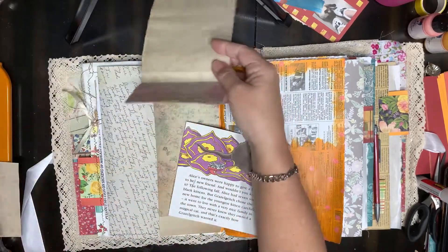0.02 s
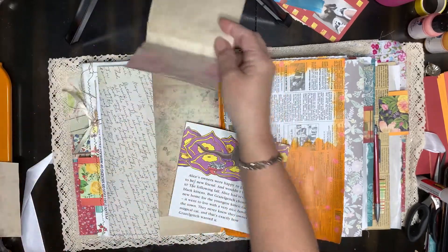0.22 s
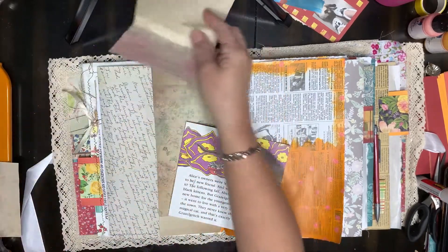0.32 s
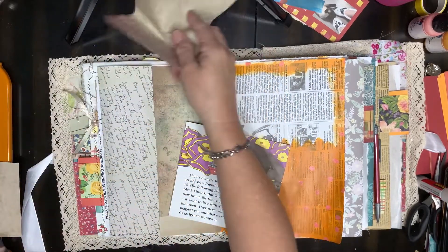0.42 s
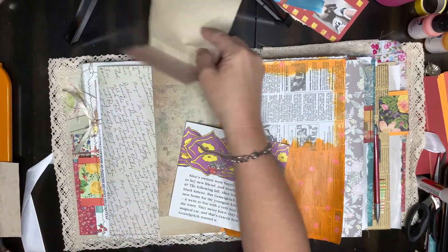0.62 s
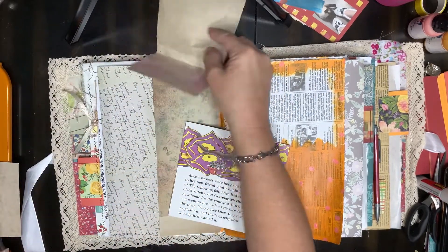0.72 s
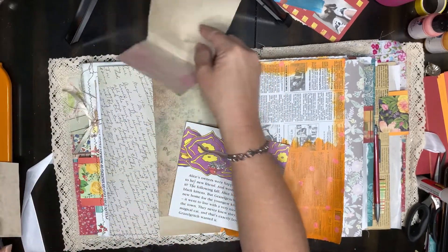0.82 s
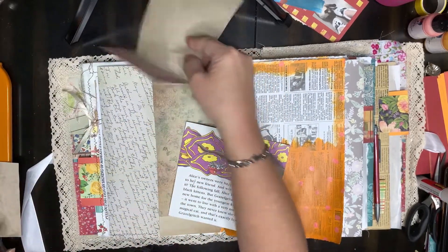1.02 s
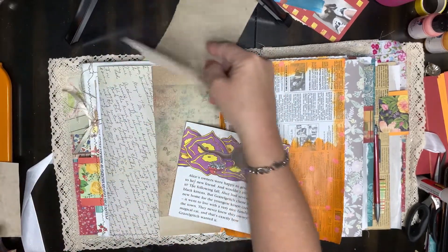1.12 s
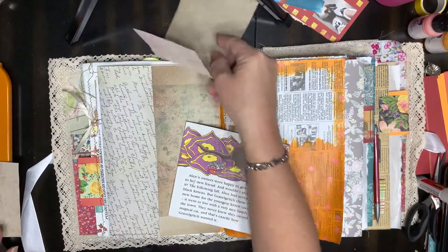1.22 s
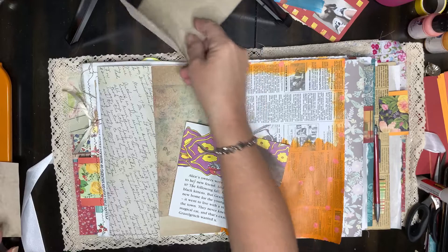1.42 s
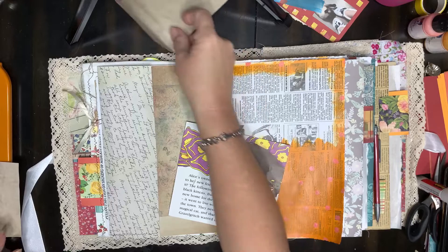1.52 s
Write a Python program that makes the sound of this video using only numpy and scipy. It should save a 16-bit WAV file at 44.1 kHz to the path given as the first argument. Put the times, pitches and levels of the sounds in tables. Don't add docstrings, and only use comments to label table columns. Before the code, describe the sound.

Stiff paper crackles and pops as it is bent above a desk, loudest near the start, with a second cluster around one second, soft hand thuds, then quiet rustle; close, fairly dry indoor sound.

```python
import sys
import numpy as np
from scipy import signal
from scipy.fft import rfft, irfft
from scipy.io import wavfile
from scipy.ndimage import uniform_filter1d, minimum_filter1d

SR = 44100
rng = np.random.default_rng(int(sys.argv[2]) if len(sys.argv) > 2 else 0)


def gain_from_db(level_db):
    decades = np.asarray(level_db, float) / 20
    return 10 ** decades


def int16_out(signal):
    q = np.round(np.clip(np.atleast_2d(signal).T, -1, 1) * 32767)
    wavfile.write(sys.argv[1], SR, q.astype(np.int16))


N = 68355


def evened(x):
    return x / np.sqrt(np.mean(x ** 2) + 1e-20)


def to_db(power):
    return 10 * np.log10(power + 1e-20)


def read(points, hz):
    f, value = np.transpose(points)
    return np.interp(np.log(hz + 1), np.log(f + 1), value)


def add(mix, s, sound):
    part = mix[round(s * SR):][:len(sound)]
    part += sound[:len(part)]


def colour(x, points):
    log_gain = np.log(gain_from_db(read(points, abs(np.fft.fftfreq(4096, 1 / SR)))))
    taps = np.fft.ifft(np.exp(np.conj(signal.hilbert(log_gain)))).real[:2048]
    return signal.oaconvolve(x, taps / np.linalg.norm(taps))[:len(x)]


def resonate(x, hz, width):
    r = np.exp(-np.pi * width / SR)
    ringing = signal.lfilter([1, 0, -1], [1, -2 * r * np.cos(2 * np.pi * hz / SR), r * r], x)
    return np.sqrt(2 * (1 - r * r)) * ringing / 2


def grains(count, per_s, spread_db):
    draw = rng.random((count, 3))
    size_db = spread_db * np.minimum(-np.log(draw[:, 0] + 1e-9), 4)
    size = gain_from_db(size_db) * np.sign(draw[:, 1] - .5)
    return evened(size * (draw[:, 2] < per_s / SR))


# f/Hz, level/dB
BODY = [(150, -2.5), (300, -12), (500, -11), (1200, -9), (2000, -12), (3500, -27), (6000, -26.5)]


def flexed(x, hz):
    return 0.76 * colour(x, BODY) + 0.46 * resonate(x, hz, .45 * hz)


# f/Hz, level/dB
CRACK = [(300, -39.5), (1000, -0.5), (2500, 1), (5000, 5), (8000, -3), (11000, -4), (14000, -18.5),
         (16000, -26)]
# t/s, level/dB, sheet f/Hz, crack over body/dB, crack f/Hz
SNAPS = [(0.0739, -40.5, 950, -0.5, 6800), (0.2472, -39, 1450, 10, 5950), (0.2881, -28, 1530, 5.5, 6000),
         (0.29, -12, 1487, -10.5, 6400), (0.2962, -37, 1700, 1, 7100), (0.3161, -15, 1320, -17, 4900),
         (0.3515, -19, 1170, -0.5, 3870), (0.3538, -21, 1390, 4.5, 3780), (0.3903, -23, 1680, -25, 3000),
         (.463, -22.5, 723, -26, 2960), (0.512, -24, 1470, -17, 2600), (0.541, -24, 910, 1, 5450),
         (0.6433, -19, 1194, 0.5, 2640), (0.674, -15.5, 1165, 3.5, 6370), (0.677, -15.5, 924, 1, 3400),
         (0.8053, -33, 920, 11, 7020), (0.8693, -40, 1120, 10, 7000), (0.886, -34, 1680, 11, 7040),
         (.9405, -29, 840, -12, 2070), (0.9444, -20.5, 497, -16, 3150), (.9475, -25, 780, -11, 3000),
         (0.9572, -29.5, 1820, 9.5, 10200), (0.9626, -16.5, 1365, -11, 2900),
         (0.9758, -38, 1970, 8.5, 3000), (1.0186, -22.5, 1980, -2, 6600)]
CRACK_T60_S, CRACK_RISE_S, CRACK_WIDTH = .009, .0004, 0.23
BODY_T60_S, BODY_RISE_S, BODY_LAG_S = 0.067, 0.000995, 0.00074
KICK_DB, KICK_WIDTH, RATTLE_DB = 6, .14, -4


def snaps():
    out, t = np.zeros(N), np.arange(4000) / SR
    late = np.maximum(t - BODY_LAG_S, 0)
    for s, db, hz, crack_db, crack_hz in SNAPS:
        a, b = rng.standard_normal((len(t), 2)).T
        burst = np.tanh(2 * a) * (1 - np.exp(-t / CRACK_RISE_S)) * gain_from_db(-60 * t / CRACK_T60_S)
        crack = colour(burst, CRACK) + 0.8 * resonate(burst, crack_hz, CRACK_WIDTH * crack_hz)
        crack = crack * gain_from_db(crack_db + 18.5)
        rattle = flexed(b * (1 - np.exp(-late / BODY_RISE_S)) * gain_from_db(-60 * late / BODY_T60_S), hz)
        push = np.exp(-2 * (hz * (late - BODY_RISE_S) * np.pi) ** 2) * hz / 1000
        kick = resonate(push, hz, KICK_WIDTH * hz)
        add(out, s, gain_from_db(db - 17.0) * (crack + gain_from_db(RATTLE_DB) * rattle + gain_from_db(KICK_DB) * kick))
    return out


# t/s, level/dB, sheet f/Hz, length/s, hiss over body/dB
SLIPS = [(.079, -48.5, 1000, 0.0077, 7.5), (0.282, -26, 1430, 0.0081, 2), (0.398, -33, 1290, 0.012, 3),
         (.418, -32.5, 1080, 0.0079, -22), (0.53, -30.5, 1230, 0.013, -2.5), (.582, -41, 1940, 0.0025, 1.5),
         (.935, -32.5, 710, 0.013, -20), (0.954, -27.5, 1720, 0.0045, 1.5), (1.004, -44.5, 2100, 0.0085, 9),
         (.664, -34, 1180, 0.011, -24), (.792, -45.5, 1010, 0.0089, -5), (.845, -50, 547, 0.025, -7),
         (.2445, -35.5, 1240, 0.0083, -1), (.266, -41, 1290, 0.0084, -33), (1.315, -59, 1120, 0.016, 3.5),
         (1.38, -66, 2050, 0.011, 5), (.214, -43, 2100, 0.0028, 5), (1.172, -48, 1700, 0.014, -1),
         (1.232, -51.5, 1360, 0.013, -17)]
# t/s, level/dB, sheet f/Hz, length/s, hiss over body/dB
DRAGS = [(.142, -52, 1700, 0.039, 1.5), (.192, -44.5, 1020, 0.049, 6), (.294, -29, 1190, 0.023, -4.5),
         (.322, -39, 1410, 0.0055, 1), (.428, -41, 1040, 0.0065, -5), (.608, -37.5, 2080, 0.03, -13),
         (.646, -28, 544, 0.00089, -13), (.654, -40.5, 880, 0.0069, 3), (1.0205, -31.5, 1500, 0.0043, -1),
         (.765, -41, 1630, 0.02, -9.5), (.968, -37.5, 1840, 0.01, -10), (.985, -45, 1500, 0.013, -1),
         (.997, -45, 2020, 0.0061, 4.5), (.808, -45, 910, 0.0049, -7), (.829, -54.5, 1202, 0.015, -2),
         (1.035, -54.5, 1380, 0.038, 4.5), (1.065, -54.5, 940, 0.032, -0.5), (1.27, -65, 2620, 0.05, 2.5)]
SWELL_RISE, DRAG_RISE = .8, .08
SLIP_T60_S, SLIP_GRAINS_PER_S = 0.0414, 2500


def slips(rows, rise):
    out, t = np.zeros(N), np.arange(9000) / SR
    for s, db, hz, length, hiss_db in rows:
        drive = 0.59 * grains(len(t), SLIP_GRAINS_PER_S, 2.8) + 0.57 * rng.standard_normal(len(t))
        fade = gain_from_db(-60 * np.maximum(t - length, 0) / SLIP_T60_S)
        rub = drive * np.minimum(t / (rise * length), 1) * fade
        add(out, s, gain_from_db(db) * (flexed(rub, hz) + gain_from_db(hiss_db) * colour(rub, CRACK)))
    return out


# t/s, rustle level/dB
EFFORT = [(0.0, -78), (0.144, -64), (0.262, -55), (0.341, -41), (0.41, -51), (0.69, -57.5), (0.8, -48.5),
          (.852, -59.5), (.9, -53), (1.078, -52), (1.15, -61.5), (1.22, -56), (1.33, -52.5), (1.44, -55),
          (1.55, -61.5)]
# f/Hz, level/dB
FIZZ = [(200, -36), (650, -26), (850, -6.5), (1200, -4), (3000, 1), (6000, -1), (9000, 0), (13000, -5),
        (16000, -14.5)]
GRAINS_PER_S, FLEX_SLOPE, FLEX_DB = 4400, 3.4, -15


def rustle():
    effort_db = np.interp(np.arange(N) / SR, *np.transpose(EFFORT))
    clumps = gain_from_db(2.54 * evened(uniform_filter1d(rng.standard_normal(N), size=500)))
    fizz = colour(grains(N, GRAINS_PER_S, 2.4) + 0.82 * rng.standard_normal(N), FIZZ)
    flex = colour(grains(N, 800, 3.2), BODY) * gain_from_db(FLEX_DB + (FLEX_SLOPE - 2) * (effort_db + 20))
    return gain_from_db(effort_db) * clumps * (fizz + flex)


# f/Hz, width/Hz, level/dB
SHEET = [(478, 260, -2), (905, 80, 3.5), (1176, 15, -7), (1356, 23, -16), (1680, 39, 3), (2080, 66, 4.5),
         (2830, 28, -35), (3130, 44, 0.5), (3410, 37, -4), (3900, 220, -17)]
SHEET_DB = -11.5


def sheet(x):
    tones = sum(gain_from_db(db) * resonate(x, hz, width) * np.sqrt(width / 3000) for hz, width, db in SHEET)
    return x + gain_from_db(SHEET_DB) * tones


# t/s, level/dB, f/Hz, length/s
THUDS = [
    (0.1, -56, 370, 0.014),
    (0.324, -48.5, 99.7, 0.033),
    (0.469, -48.5, 190, 0.021),
    (.56, -69, 160, 0.073),
    (0.797, -51, 208, 0.041),
    (1.08, -67, 184, 0.05),
]


def thuds():
    out = np.zeros(N)
    for s, db, hz, length in THUDS:
        t = np.arange(0, 2 * length, 1 / SR)
        swell = np.sin(np.pi * np.sqrt(t / (2 * length))) ** 2
        add(out, s, gain_from_db(db) * swell * np.sin(2 * np.pi * hz * t))
    return out


# f/Hz, t60/s
ROOM = [(300, 0.17), (1000, 0.12), (4000, 0.16), (12000, 0.029)]


def room(x):
    taps = np.zeros((2, 16000))
    at = np.arange(120, 15960, 20) + rng.integers(0, 20, (2, 792))
    np.put_along_axis(taps, at, rng.choice([-1., 1.], at.shape), 1)
    hz, t, z = signal.stft(taps, SR, nperseg=128)
    tail = signal.istft(z * gain_from_db(-60 * t / read(ROOM, hz)[:, None]), SR, nperseg=128)[1]
    return signal.fftconvolve(x[None], tail / np.linalg.norm(tail[0]), axes=1)[:, :N]


# f/Hz, level/dB
HUM = [(15, -57), (30, -24), (50, -5.5), (91, -5), (150, -3.5), (180, -17), (320, -30), (500, -40)]
# f/Hz, level/dB, t60/s
RING = [
    (296, -62, 1),
    (500, -75, 0.32),
]
# t/s, rumble change/dB, low-mid floor change/dB
STIR = [
    (0, -2, -5.5),
    (.2, -4, 9),
    (0.341, 1.5, 21),
    (.7, 0, 7),
    (.9, 2, 14),
    (1.1, -1.5, 9.5),
    (1.2, 0, 2.5),
    (1.33, -10.5, -3.5),
    (1.55, -5, -7.5),
]
HUM_DB, FLOOR_DB = -61, -74.5


def hum():
    a, b = rng.standard_normal((N, 2)).T
    shape, t = gain_from_db(read(HUM, np.fft.rfftfreq(N, 1 / SR))), np.arange(N) / SR
    at, rumble_db, floor_db = np.transpose(STIR)
    rumble = evened(irfft(rfft(np.array([a + 0.097 * b, a - 0.15 * b])) * shape, N))
    rumble = rumble * gain_from_db(HUM_DB + np.interp(t, at, rumble_db))
    c, d = rng.standard_normal((N, 2)).T
    low_cut = signal.butter(3, 190, "high", fs=SR, output="sos")
    floor = [signal.sosfilt(low_cut, colour(colour(v, BODY), BODY)) for v in (c + .25 * d, c - .25 * d)]
    floor = gain_from_db(FLOOR_DB + np.interp(t, at, floor_db)) * np.array(floor)
    ring = sum(gain_from_db(db - 60 * t / t60) * np.sin(2 * np.pi * hz * t) for hz, db, t60 in RING)
    return rumble + floor + ring


# f/Hz, phase/rad
LEAD = [(0, 0), (900, -.4), (1500, -.1), (2300, 1.4), (3500, 1.4), (4700, 3.14), (8970, 9.42),
        (15300, 18.85)]


def ports(x):
    lead = np.interp(np.fft.rfftfreq(N, 1 / SR), *np.transpose(LEAD))
    return np.array([x, irfft(rfft(x) * np.exp(-1j * lead), N)])


TOP_FROM_HZ, TOP_DROP_PERCENT, TOP_FOLLOW = 13400, 68, .6
PAIR_DROP_DB, JUMP_DB = -10, 10


def thinned(x):
    pair = np.array([x[0] + x[1], x[0] - x[1]]) / 2
    hz, t, z = signal.stft(pair, SR, nperseg=1024, noverlap=768)
    band_hz = hz[4:508, None]
    bands = abs(z[:, 4:508].reshape(2, 63, 8, -1)) ** 2
    band_db = np.repeat(to_db(uniform_filter1d(bands.sum(2), 4)), 8, axis=1)
    weak = (band_db < band_db[::-1] + PAIR_DROP_DB) & (band_hz > 3000)
    spare_db = band_db - TOP_FOLLOW * band_db[:, 60:280].mean((0, 1))
    limit_db = np.percentile(spare_db[:, 308:388], TOP_DROP_PERCENT)
    faint = (spare_db < limit_db) & (band_hz > TOP_FROM_HZ)
    fast_db = to_db(uniform_filter1d(np.diff(x[0], prepend=0) ** 2, size=128))
    recent_db = to_db(uniform_filter1d(np.roll(gain_from_db(2 * fast_db), 400), size=600))
    jump = fast_db - recent_db > JUMP_DB
    calm = np.interp(t * SR, np.arange(N), uniform_filter1d(1. * jump, size=700)) < 1e-6
    keep = np.ones(z.shape)
    keep[:, 4:508] = ~((weak | faint) & calm)
    mid, side = signal.istft(z * keep, SR, nperseg=1024, noverlap=768)[1][:, :N]
    return np.array([mid + side, mid - side])


SHORT_FROM_HZ, SHORT_DROP_PERCENT, SHORT_REACH = 11000, 36, 1200


def gapped(x):
    hz, t, z = signal.stft(x, SR, nperseg=256)
    power = abs(z[:, :128].reshape(2, 16, 8, -1)) ** 2
    band_db = to_db(uniform_filter1d(power.sum((0, 2)), size=3))
    spare_db = np.repeat(band_db + minimum_filter1d(-band_db[1:9].mean(0), size=15), 8, axis=0)
    fast = uniform_filter1d(np.diff(x[0], prepend=0) ** 2, size=128) + 1e-20
    recent = abs(uniform_filter1d(np.roll(fast, 400), size=600))
    jump = 10 * np.log10(fast / recent) > JUMP_DB
    near = np.interp(t * SR, np.arange(N), uniform_filter1d(1. * jump, size=SHORT_REACH)) > 1e-6
    open_to = near & (hz[:128, None] > SHORT_FROM_HZ)
    limit_db = np.percentile(spare_db[open_to & (hz[:128, None] < 16000)], SHORT_DROP_PERCENT)
    keep = np.ones(z.shape[1:])
    keep[:128] = ~(open_to & (spare_db < limit_db))
    return signal.istft(z * keep, SR, nperseg=256)[1][:, :N]


SHEET_LOW_HZ = 289
WET_DB, WIDE_DB = -12.5, -17


def scene():
    paper = sheet(snaps() + slips(SLIPS, SWELL_RISE) + slips(DRAGS, DRAG_RISE) + rustle())
    paper = signal.sosfilt(signal.butter(3, SHEET_LOW_HZ, "high", fs=SR, output="sos"), paper)
    near, wide = room(paper)
    direct = ports(paper + gain_from_db(WET_DB) * near + thuds())
    return direct + gain_from_db(WIDE_DB) * wide * np.array([[1], [-1]]) + hum()


def roll_off(x):
    return signal.sosfilt(signal.butter(12, 16960, fs=SR, output="sos"), x)


# f/Hz, level/dB
TOP_FALL = [(20, 0), (14000, 0), (15600, -3), (16000, -20), (16600, -24), (16950, -40), (22000, -70)]


def record(dry):
    heard = irfft(rfft(dry) * gain_from_db(read(TOP_FALL, np.fft.rfftfreq(N, 1 / SR))), N)
    return roll_off(gapped(thinned(heard)))


dry = scene()
out = record(dry)
int16_out(out)
```